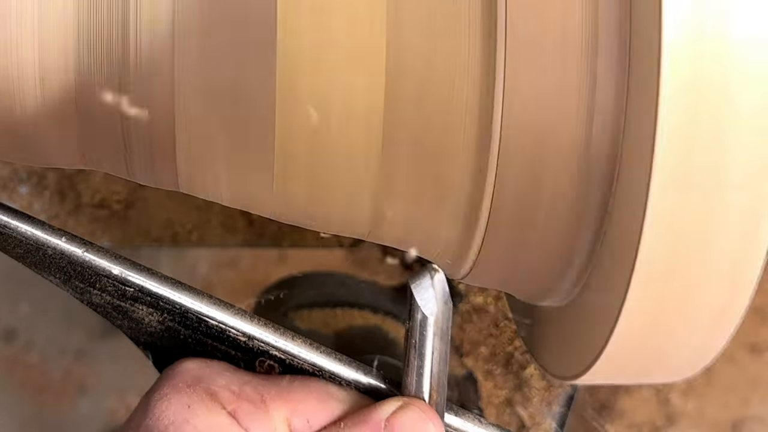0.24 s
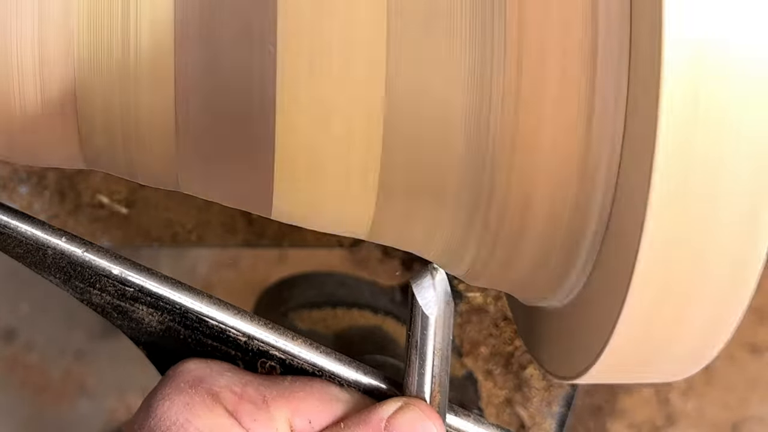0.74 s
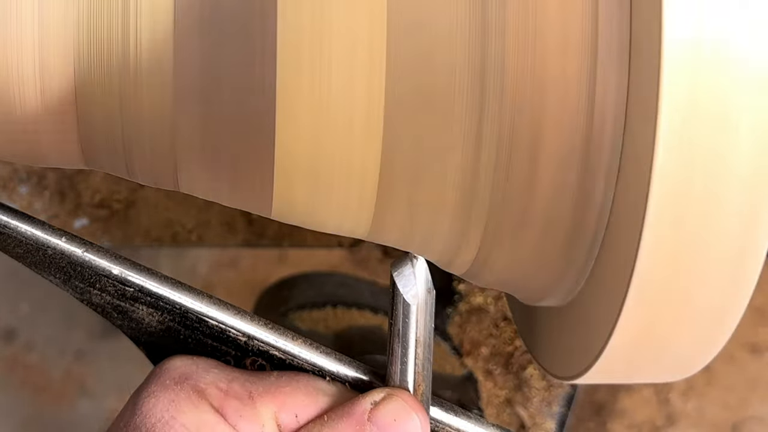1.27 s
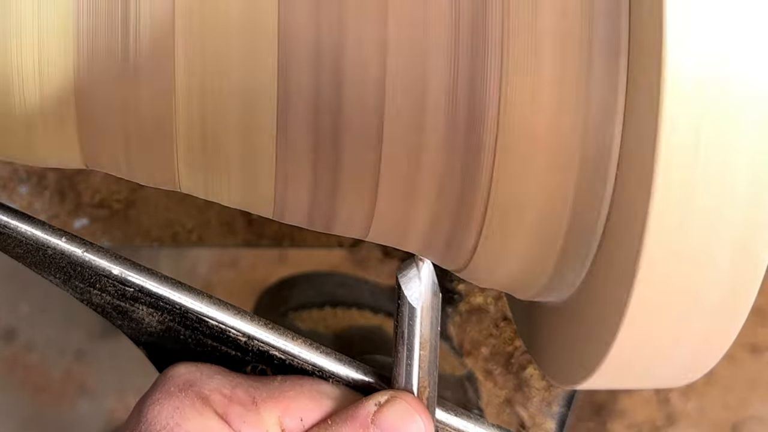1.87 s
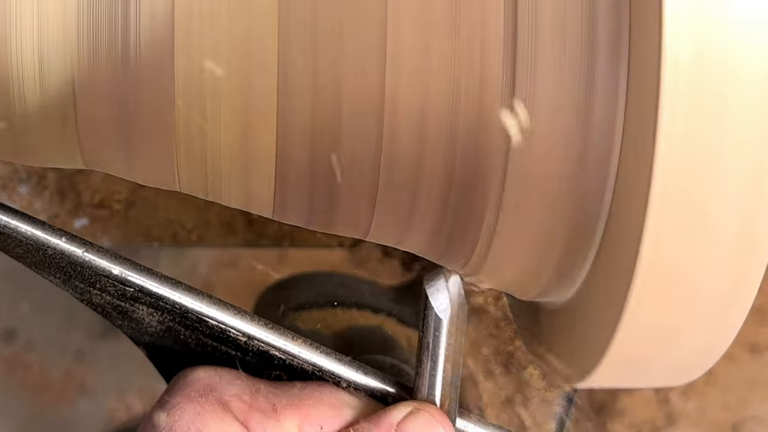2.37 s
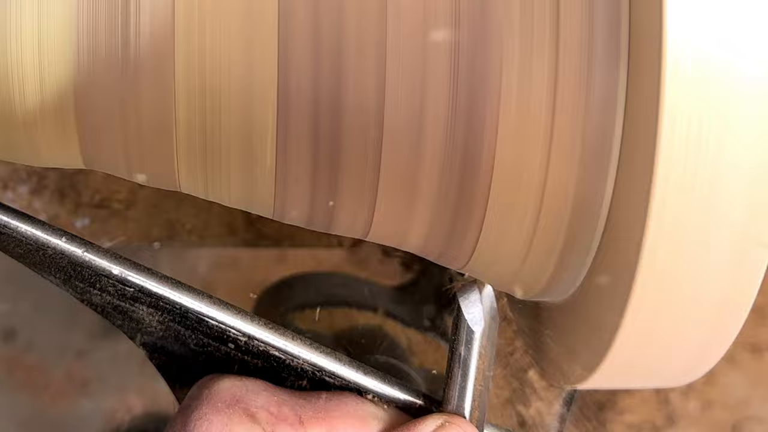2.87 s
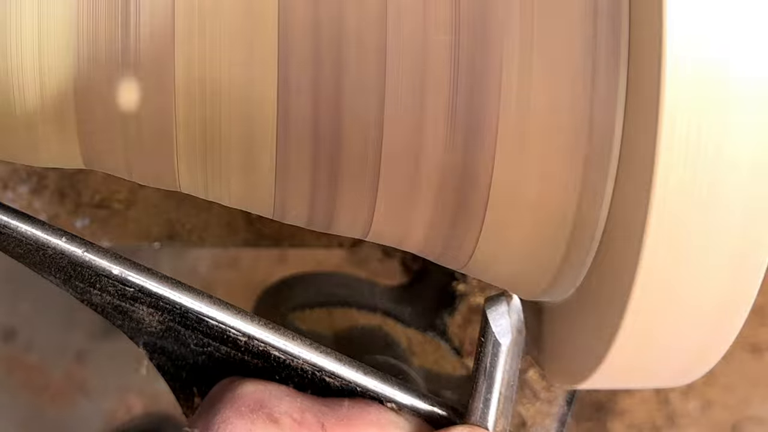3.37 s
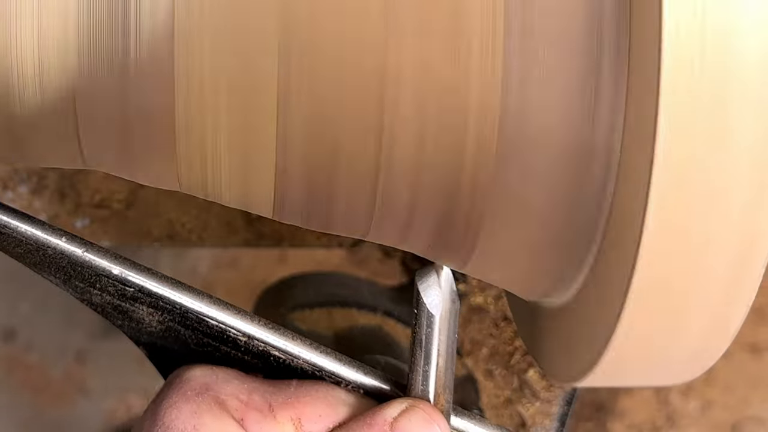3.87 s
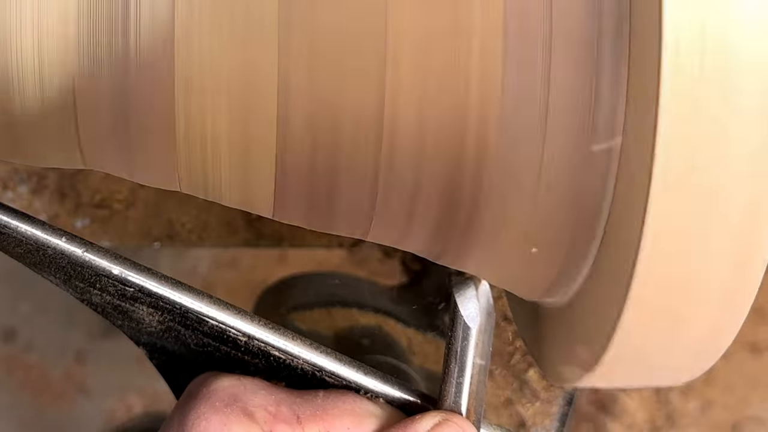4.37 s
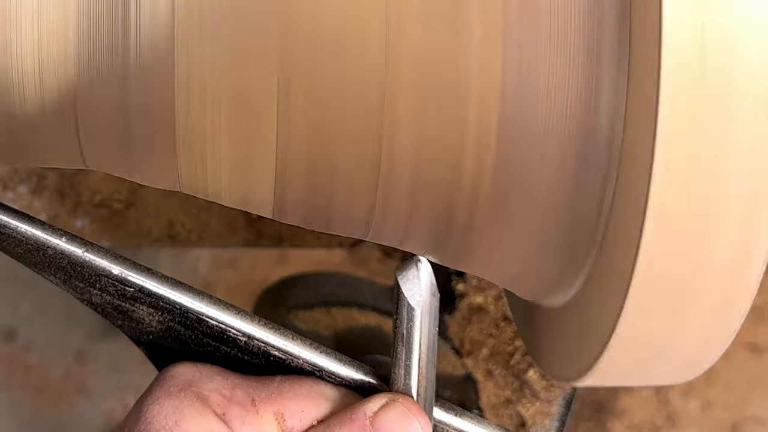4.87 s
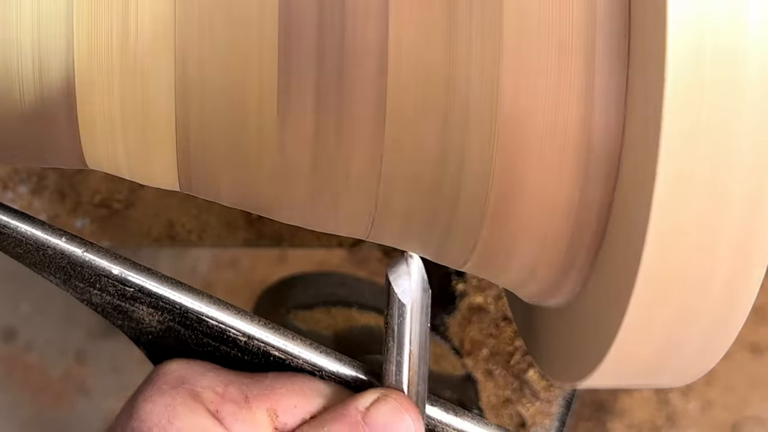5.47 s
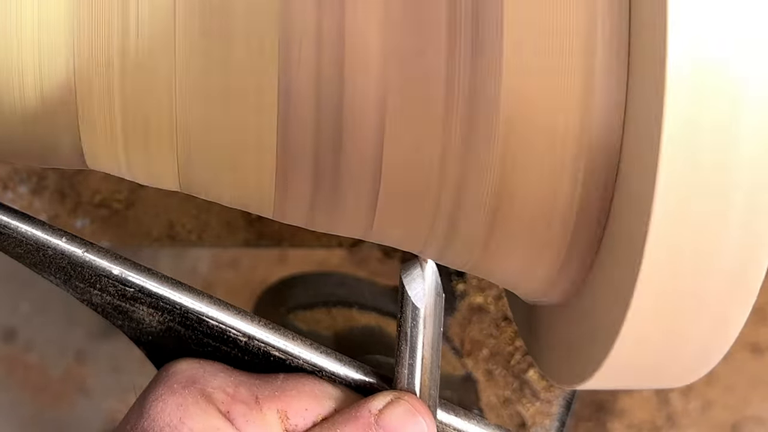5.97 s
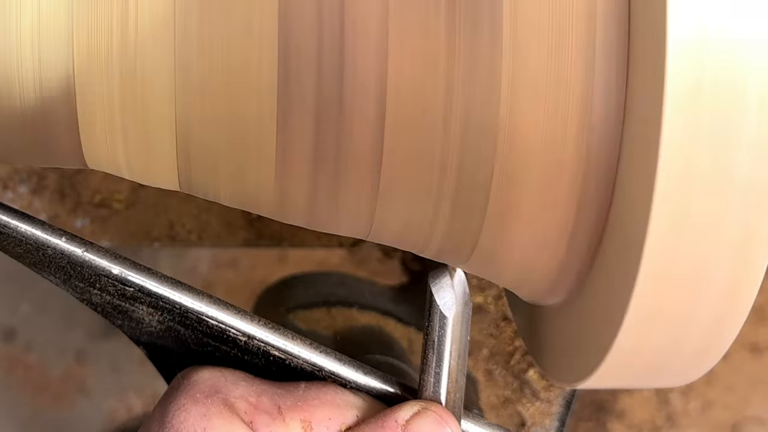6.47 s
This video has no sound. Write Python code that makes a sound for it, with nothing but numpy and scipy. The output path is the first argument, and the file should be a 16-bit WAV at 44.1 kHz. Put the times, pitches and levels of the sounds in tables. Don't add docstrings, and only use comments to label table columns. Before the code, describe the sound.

Close mono microphone at a wood lathe in a small, dull-sounding workshop. Under everything is a soft motor and belt rumble. Over it the gouge repeatedly meets the wood: dense crackling shavings, mid-high woody ringing, metallic tool shimmer and dusty hiss, with a rapid buzzing throb and occasional stuttering catches. The edge lifts cleanly several times, leaving just the machine; the final pass continues unbroken.

```python
import sys
import numpy as np
from scipy import signal
from scipy.io import wavfile
from scipy.ndimage import uniform_filter1d

SR = 44100
rng = np.random.default_rng(int(sys.argv[2]) if len(sys.argv) > 2 else 0)


def log_audio(samples):
    frames = np.atleast_2d(samples).T
    limited = np.clip(frames, -1, 1)
    pcm = np.round(limited * 32767).astype(np.int16)
    wavfile.write(sys.argv[1], SR, pcm)


def volts(x):
    e = np.asarray(x, float) / 20
    return 10 ** e


N = 297234
T = np.arange(N) / SR
SPINDLE_HZ = 54.0


def unit(x):
    return x / np.sqrt(np.mean(x ** 2))


def walk(rate_hz):
    hold = int(SR / rate_hz)
    steps = np.repeat(rng.standard_normal(N // hold + 1), hold)
    slewed = uniform_filter1d(uniform_filter1d(steps, hold), hold)
    return unit(slewed[:N])


def swell(start_s, length_s):
    out, i = np.zeros(N), int(start_s * SR)
    u = np.arange(int(6 * length_s * SR)) * 3 / (length_s * SR)
    out[i:i + len(u)] = u * np.exp(1 - u)
    return out


def ring(x, hz, width_hz):
    return signal.lfilter(*signal.iirpeak(hz, hz / width_hz, fs=SR), x)


def noise_band(hz, width_hz, skirt_hz):
    return unit(ring(ring(rng.standard_normal(N), hz, width_hz), hz, skirt_hz))


# f/Hz, density/dB per Hz
LATHE_SPECTRUM = [(20, -11.5), (60, -13), (140, -3.5), (290, -3), (400, -9.5), (700, -16), (1100, -14),
                  (1700, -17.5), (2500, -23.5), (4900, -30.5), (5600, -30.5), (8300, -33.5), (9000, -43.5),
                  (15500, -48)]
# t/s, level/dB
RUMBLE_LEVEL = [(0.0, -50), (1.4, -50), (3.3, -52), (4.6, -52), (5.6, -51), (6.05, -49.5), (6.74, -50)]
# f/Hz, width/Hz, level/dB
HOUSING_MODES = [(204.5, 35, -59.5), (287, 55, -60), (518, 60, -63), (1210, 32, -67.5), (1583, 66, -72)]
# f/Hz, width/Hz, level/dB
DRIVE_WHINE = [(10800, 40, -89), (11235, 12, -91), (11520, 50, -94)]


def lathe():
    hz_points, db_points = np.transpose(LATHE_SPECTRUM)
    rumble = 0
    for hz in 20 * 2 ** np.arange(0, 9.7, 1 / 4):
        density_db = np.interp(np.log(hz), np.log(hz_points), db_points)
        band_db = density_db + 10 * np.log10(hz) + 1.5 * walk(10)
        rumble = rumble + volts(band_db) * noise_band(hz, hz / 3.63, hz / 3.63)
    rumble_db = np.interp(T, *np.transpose(RUMBLE_LEVEL)) + 2.52 + 0.5 * walk(13)
    out = unit(rumble) * volts(rumble_db)
    for hz, width_hz, db in HOUSING_MODES + DRIVE_WHINE:
        flicker_hz = 9 if hz > 5000 else 25
        out = out + volts(db + 2.6 * walk(flicker_hz)) * noise_band(hz, width_hz, 3 * width_hz)
    return out


def shop(x):
    t60_s, first_echo_s = 0.33, 0.004
    t = T[:SR // 2]
    dull = signal.lfilter([1], [1, -0.6], rng.standard_normal(len(t)))
    tail = dull * volts(-60 * t / t60_s) * (t > first_echo_s)
    return signal.fftconvolve(x, tail / np.linalg.norm(tail))[:N]


def fibres(scatter_db):
    return unit(rng.standard_normal(N) * volts(scatter_db * rng.exponential(size=N)))


def body(x, modes, pressure_db=0, wander_db=0):
    out = 0
    for k, (hz, width_hz, db, slope) in enumerate(modes):
        mode_db = db + slope * pressure_db
        if wander_db:
            mode_db = mode_db + wander_db * walk(20)
        out = out + (-1) ** k * ring(ring(volts(mode_db) * x, hz, width_hz), hz, 4 * width_hz)
    return out


# high spot at touch/turns, creep/turns per s, end grain/turns, creep/turns per s, deep knock/turns
SPOTS_BY_PASS = [(.15, -1.2, .08, .1, .03), (0, -.1, -.12, .27, -.2), (-.4, .4, .09, .15, -.45),
                 (-.27, -.63, -.04, -.24, -.03), (-.7, .45, -.18, .23, -.07), (-.92, .3, .25, .08, -.22),
                 (-1.08, -.8, .2, -1.4, -.28), (-1, .2, .07, .16, -.35)]
# mid t/s, half length/s, extra depth/1
LOW_SIDE_SKIPS = [
    (.28, 0.07, 0.61),
    (.76, 0.088, .5),
    (1.594, 0.067, 0.25),
    (2.274, 0.054, 0.31),
    (3.2, 0.21, 0.097),
    (3.5, .1, 0.33),
    (6.45, .15, 0.089),
]
THROB_FOLLOW = [0.85, 0.83, 0.63, 0.43, 0.63]
JOINT_KNOCK = [0.072, .01, 0.011, 0.55, .01]


def throb():
    steady_once, twice = 0.16, 0.14
    starts = np.array([table[0][0] for table in PASS_PRESSURE])
    k = np.maximum(np.searchsorted(starts, T + 0.01) - 1, 0)
    high, high_creep, grain, grain_creep, joint = np.transpose(SPOTS_BY_PASS)[:, k]
    since_s, turn = T - starts[k], SPINDLE_HZ * T
    once = steady_once + sum(depth * np.exp(-((T - mid_s) / half_s) ** 2)
                             for mid_s, half_s, depth in LOW_SIDE_SKIPS)
    swing = once * np.cos(2 * np.pi * (turn - high - high_creep * since_s))
    swing = swing + twice * np.cos(4 * np.pi * (turn - grain - grain_creep * since_s))
    boom = np.cos(2 * np.pi * (turn - joint)) - 0.35
    level_trim = 0.81 * (once ** 2 + twice ** 2)
    return np.exp(np.outer(THROB_FOLLOW, swing) + np.outer(JOINT_KNOCK, boom) - level_trim)


# first t/s, count/turns, first peak/dB, change/dB per turn, brightness/dB
HIGH_SPOT_CATCHES = [(0.255, 3, -24, 0.8, -1), (0.3105, 4, -14, -0.1, -0.5), (0.756, 4, -22, -1, -10),
                     (0.826, 2, -23, 4, 2), (1.424, 1, -34, 0, 0), (1.455, 2, -19.5, -3, -9),
                     (1.561, 2, -19, 2, -3), (2.188, 1, -21, 0, -2), (2.2255, 1, -17, 0, 0),
                     (2.2625, 1, -21, 0, -7), (2.656, 1, -23, 0, 7), (3.3725, 3, -23.5, -7, 2),
                     (3.468, 1, -27, 0, 2), (3.487, 1, -30, 0, 4), (3.505, 1, -35.5, 0, 12.5)]


def catches():
    out = np.zeros((2, N))
    for start_s, turns, db, step_db, bright_db in HIGH_SPOT_CATCHES:
        for k in range(round(turns)):
            peak_db = db + k * step_db - 19 + np.array([[0], [bright_db]])
            out += volts(peak_db) * swell(start_s + k / SPINDLE_HZ, length_s=0.01)
    return out


def touch(t, s, fade_db_s):
    onset = np.clip((t - s[0]) / TOUCH_S + 0.5, 0, 1)
    return onset * volts(-fade_db_s * np.maximum(t - s[-1], 0))


# t/s, level/dB
PASS_PRESSURE = [
    [(0.241, -57), (0.262, -42), (0.3, -39), (0.36, -36.5), (0.488, -38.5), (0.506, -46)],
    [(0.722, -58), (0.738, -43.5), (0.766, -37.5), (0.89, -38.5), (0.998, -36), (1.095, -42),
     (1.109, -47.5)],
    [(1.315, -55), (1.393, -46), (1.425, -42.5), (1.445, -37.5), (1.565, -38), (1.603, -41), (1.612, -49)],
    [(1.812, -51), (1.92, -42), (2.247, -36.5), (2.339, -39), (2.459, -36), (2.64, -39), (2.69, -33),
     (2.87, -36), (3.514, -49)],
    [(3.693, -47), (3.75, -58), (3.794, -44.5), (3.9, -38.5), (4.014, -41.5), (4.39, -38.5), (4.654, -39.5),
     (4.679, -49.5)],
    [(5.005, -61), (5.035, -48), (5.243, -39.5), (5.295, -44.5), (5.327, -63)],
    [(5.542, -48.5), (5.58, -54), (5.628, -47), (5.641, -53)],
    [(5.762, -47), (5.892, -39), (5.944, -41), (6.096, -37), (6.2, -39.5), (6.252, -36.5), (6.32, -40),
     (6.568, -39.5), (6.74, -38.5)],
]
# touch tick/dB, shank song after it/dB
PASS_TOUCHES = [(-15, -1), (-1, -3), (3, 8), (-11, 5), (-1, 6), (2, 3), (-6, .5), (-13, 10.5)]
# level over blank/dB, gain/dB per dB pressure, lift fade/dB per s, tick/dB
PART_LEVELS = [(-1, 0, 900, -49), (-0.5, -0.2946, 1500, -60), (-3.5, -0.26, 2000, -58),
               (-4.5, 0.18, 900, -45), (-9, -0.04, 1500, -46)]
# t/s, brightness/dB
WRIST_ROLL = [(0.3, 0), (0.36, -0.5), (0.49, 0.2), (0.85, -1), (1.09, .5), (1.5, -.5), (2.25, -.5),
              (2.6, 1), (2.8, -1), (3.3, 0.9), (3.5, 2.5), (3.94, -1.1), (4.4, 0.5), (4.65, 1.5),
              (5.25, -0.7), (6.1, -0.1), (6.35, 1), (6.7, 0.5)]
ROLL_FOLLOW = [0.035, 0.35, 1.3, -0.6, -0.38]
# mid t/s, half length/s, bite/dB, shank/dB
FLUTE_DIGS = [(0.35, 0.023, 7, -5), (.77, 0.046, -5, 4), (.84, 0.026, 2, 10), (1.063, .04, 3, .5),
              (1.35, .05, 3, 0), (1.447, .03, 4, .3), (2.008, 0.1, 2, 3), (2.46, 0.056, 2, .3),
              (2.996, 0.11, 0.5, -12), (3.45, 0.049, -3, -3), (4.437, 0.13, 4.5, -1), (5.26, .05, 1.5, 4),
              (6.108, 0.26, 3, 1), (6.328, 0.031, 2.5, 11.5), (6.6, 0.058, 1, 2)]
MIDDLE_DB, TOUCH_S, TICK_S = -44, 0.007, 0.0066
SONG_S = 0.12


def pressure():
    gains, pressure_db = np.zeros((5, N)), np.zeros(N)
    over_db, slope, fade_db_s, tick_db = np.transpose(PART_LEVELS)[:, :, None]
    for table, (touch_db, song_db) in zip(PASS_PRESSURE, PASS_TOUCHES):
        s, db = np.transpose(table)
        on = (T > s[0] - TOUCH_S) & (T < s[-1] + 0.08)
        t = T[on]
        blank_db = np.interp(t, s, db)
        roll_db = np.interp(t, *np.transpose(WRIST_ROLL)) * np.c_[ROLL_FOLLOW]
        part_db = blank_db + over_db + slope * (blank_db - MIDDLE_DB) + roll_db
        part_db[-1] += song_db * np.exp(-np.maximum(t - s[0], 0) / SONG_S)
        for mid_s, half_s, bite_db, shank_db in FLUTE_DIGS:
            part_db[-2:] += np.c_[[bite_db, shank_db]] * np.exp(-((t - mid_s) / half_s) ** 2)
        tick = volts(tick_db + touch_db) * swell(s[0], TICK_S)[on]
        gains[:, on] = touch(t, s, fade_db_s) * volts(part_db) + tick
        pressure_db[on] = np.clip(blank_db - MIDDLE_DB, -14, 10)
    return gains, pressure_db


# f/Hz, width/Hz, level/dB, slope/dB per dB pressure (below 0: sings in a light touch)
BLANK_MODES = [(1856, 218, 1.5, 0.28), (2159, 129, 0.5, 0.3), (2317, 110, 1, 0.17), (2500, 77, -4, 0.71),
               (2802, 184, 1.5, 0.23), (3312, 158, -2.5, 0)]
TOOL_MODES = [(3740, 1000, -3, 0.2), (4434, 350, 2.5, 0.29), (5135, 370, -1, 0.24), (5844, 420, 0.5, 0.098),
              (6800, 920, -4.5, -0.032)]
HISS_MODES = [(7150, 670, -6.5, .01), (7875, 380, 5.5, 0.11), (8770, 1830, -1, .01),
              (10770, 1300, -3.5, 0.027), (11830, 900, -0.5, 0.023), (13350, 570, -3, .01),
              (13800, 700, -1.5, .01), (15000, 700, -7.5, .01)]
BITE_MODES = [(822, 365, -14, 0.19), (996, 138, -8.5, 0.3), (1374, 175, 0.5, 0.011), (1683, 134, -2, .01)]
SHANK_MODES = [(4624, 130, -1.3, .01), (4850, 115, -0.74, .01)]


def gouge():
    gains, pressure_db = pressure()
    low, high = catches()
    caught = [low, volts(-2.5) * high, volts(-6.5) * high, volts(-5) * low, volts(-9) * high]
    gains = np.hypot(gains * throb(), caught)
    gains *= volts(0.6 * walk(300))
    parts = (BLANK_MODES, TOOL_MODES, HISS_MODES, BITE_MODES, SHANK_MODES)
    wanders_db = (1.4, 1.07, 0.6, 0.43, 0.47)
    out = 0
    for gain, modes, wander_db in zip(gains, parts, wanders_db):
        tear, chips = fibres(scatter_db=1.95), volts(1.1 * walk(160))
        ringing = body(gain * chips * tear, modes, pressure_db, wander_db)
        out = out + ringing / np.std(body(tear[:SR], modes))
    return out


def scene():
    cut = gouge()
    return np.tile(cut + volts(-31.5) * shop(cut) + lathe(), (2, 1))


def low_pass(x):
    return signal.sosfilt(signal.butter(12, 16280, fs=SR, output="sos"), x)


def record(dry):
    top = signal.ellip(14, 0.2, 70, 15740, fs=SR, output="sos")
    return low_pass(signal.sosfilt(top, dry))


dry = scene()
out = record(dry)
log_audio(out)
```